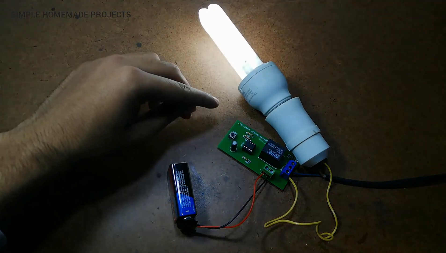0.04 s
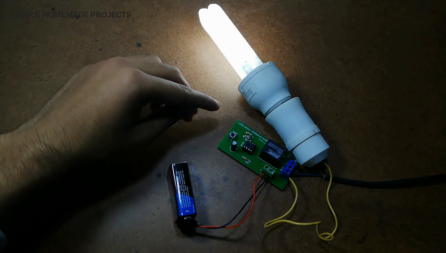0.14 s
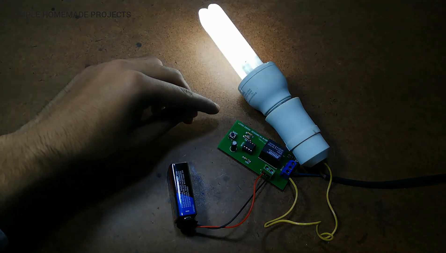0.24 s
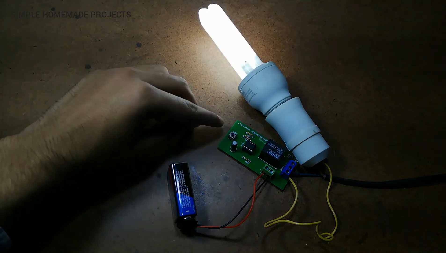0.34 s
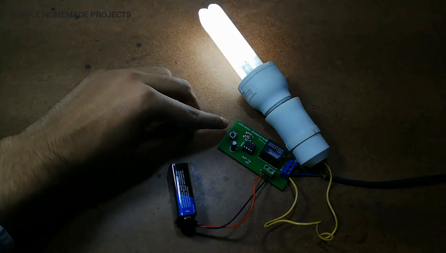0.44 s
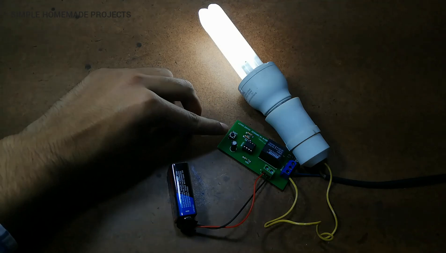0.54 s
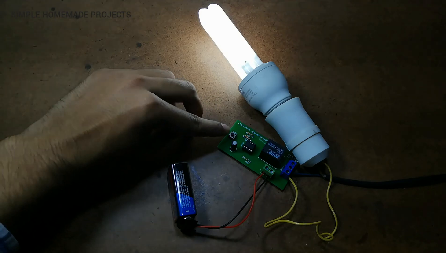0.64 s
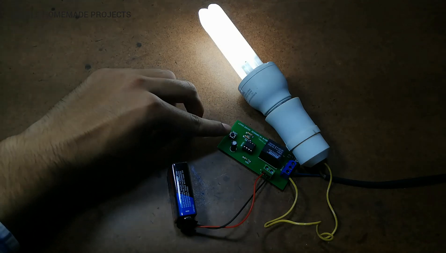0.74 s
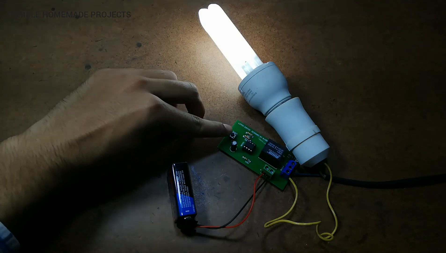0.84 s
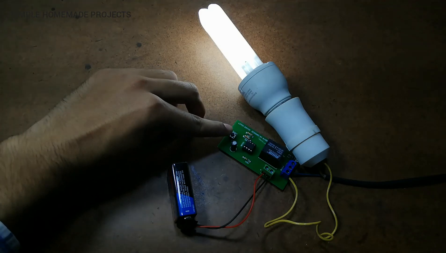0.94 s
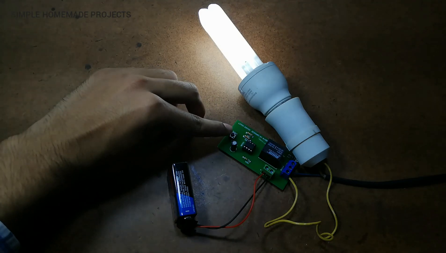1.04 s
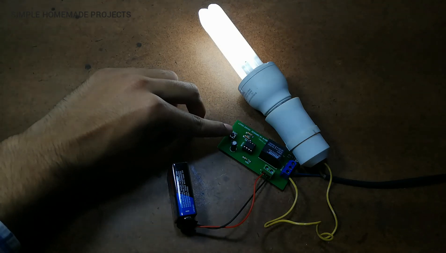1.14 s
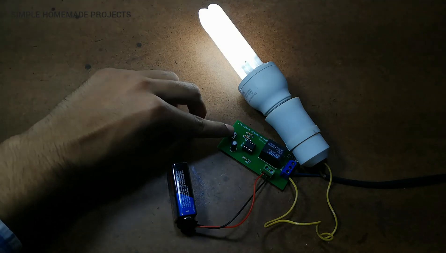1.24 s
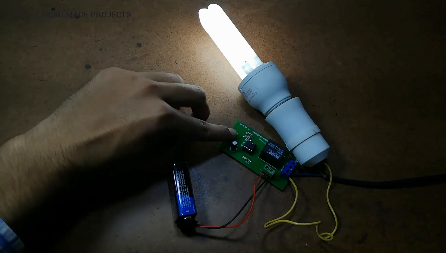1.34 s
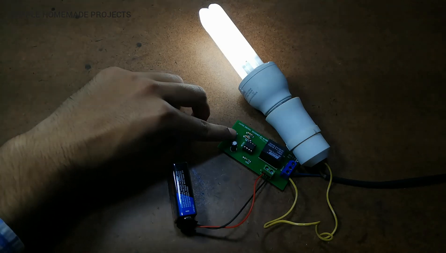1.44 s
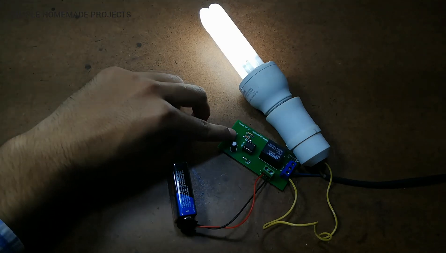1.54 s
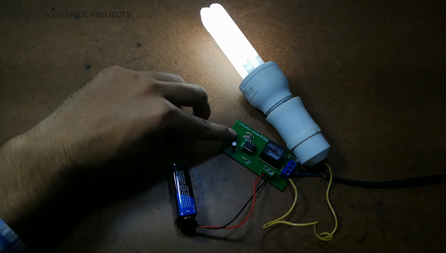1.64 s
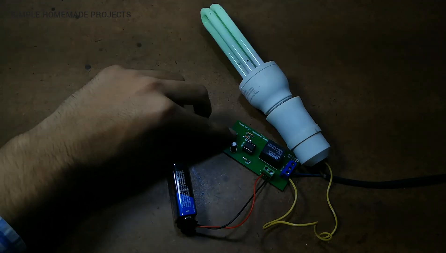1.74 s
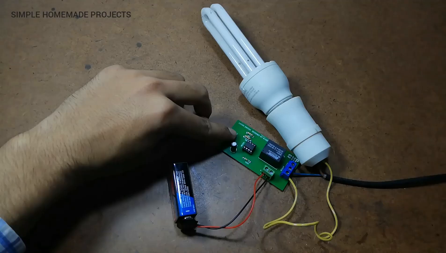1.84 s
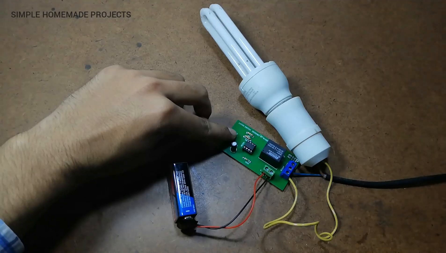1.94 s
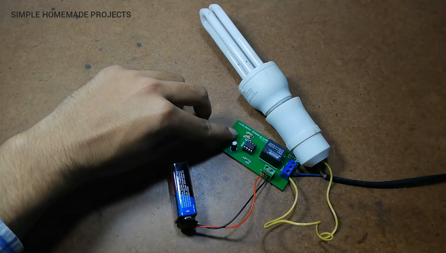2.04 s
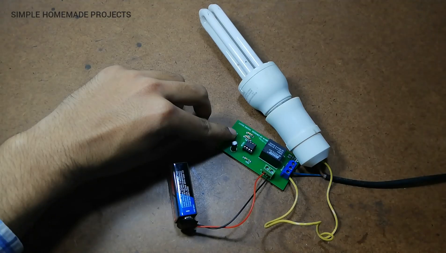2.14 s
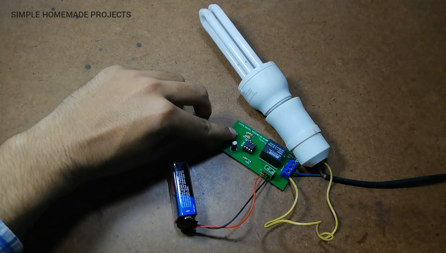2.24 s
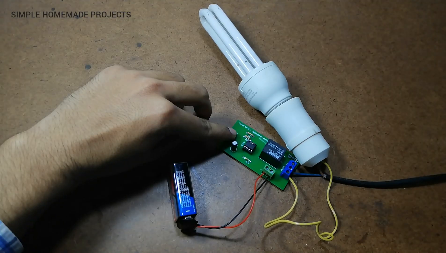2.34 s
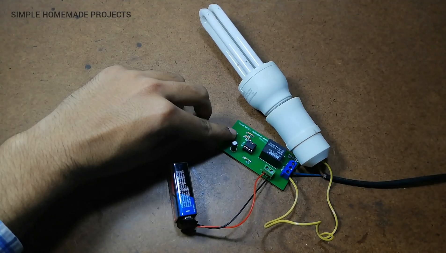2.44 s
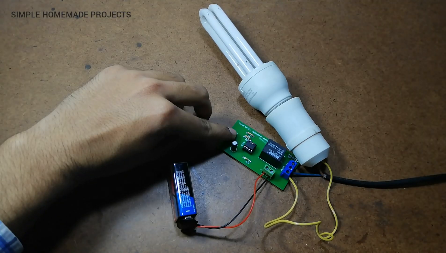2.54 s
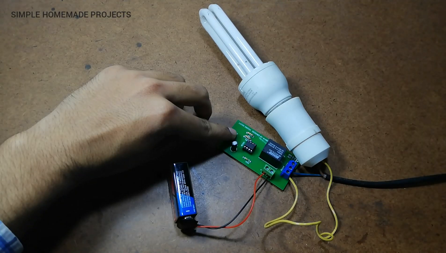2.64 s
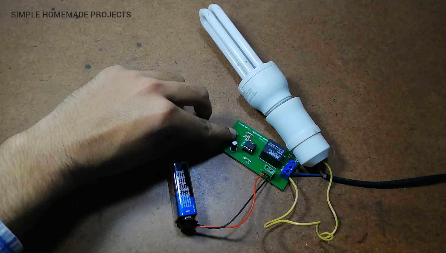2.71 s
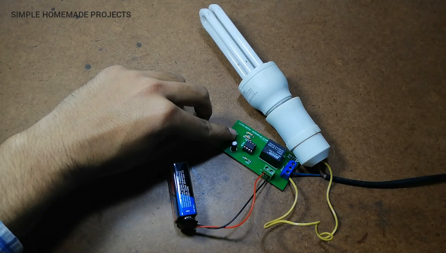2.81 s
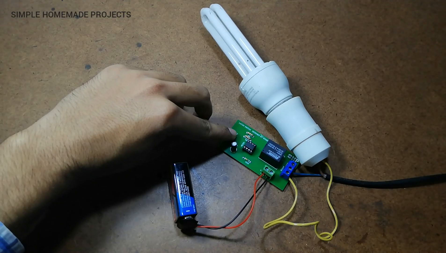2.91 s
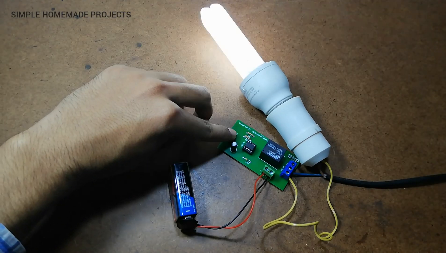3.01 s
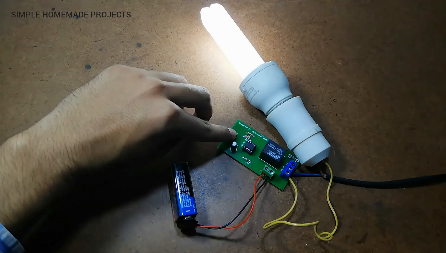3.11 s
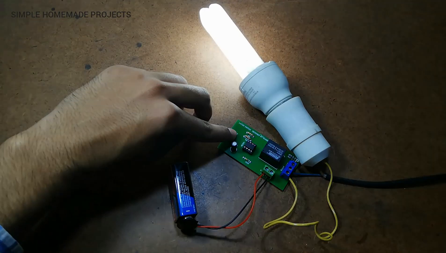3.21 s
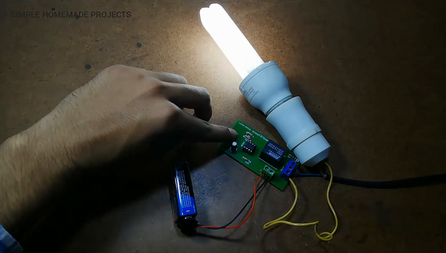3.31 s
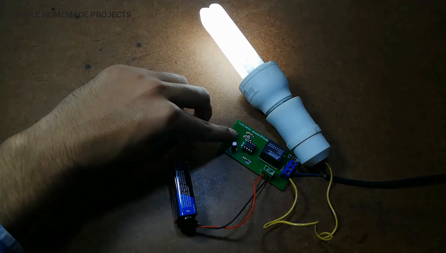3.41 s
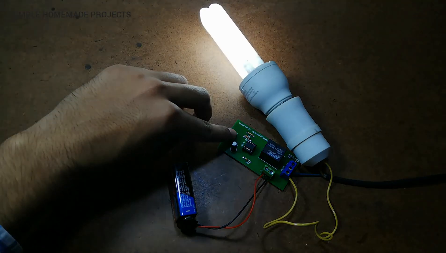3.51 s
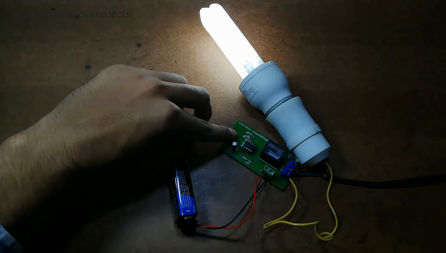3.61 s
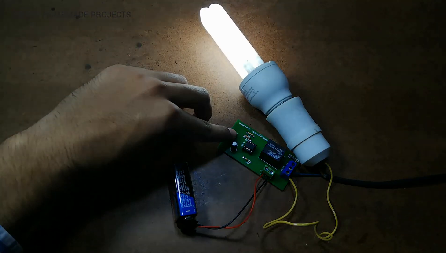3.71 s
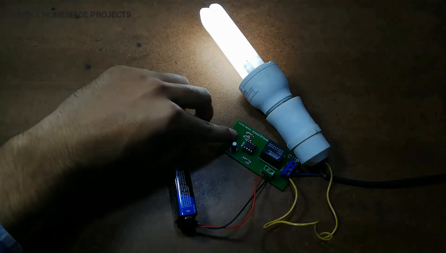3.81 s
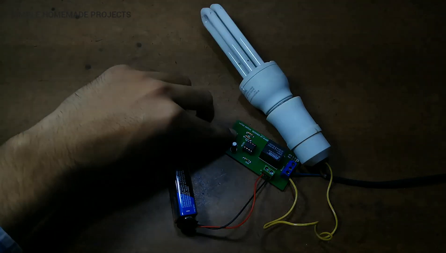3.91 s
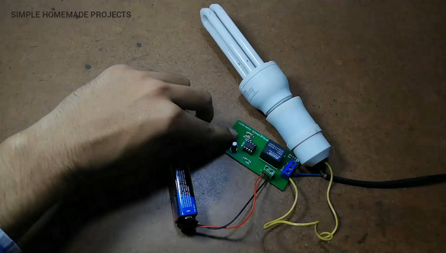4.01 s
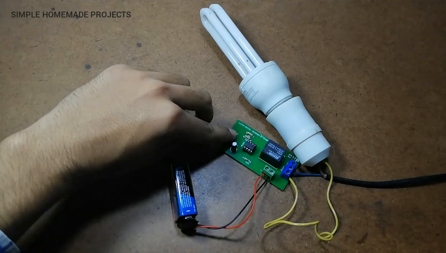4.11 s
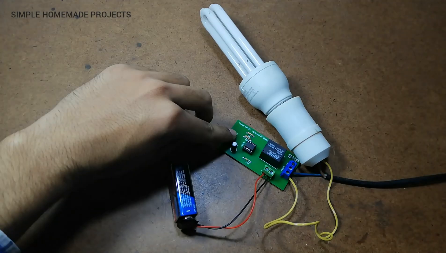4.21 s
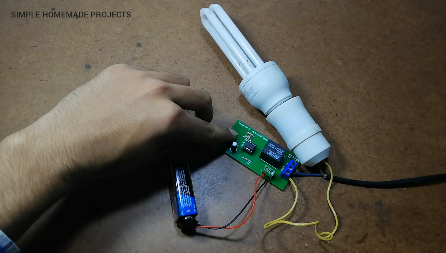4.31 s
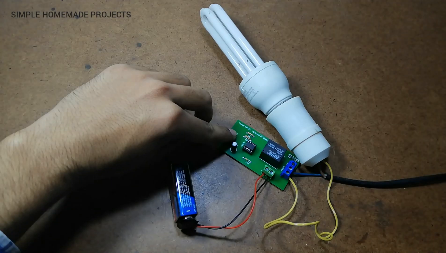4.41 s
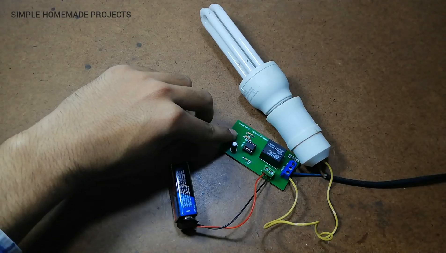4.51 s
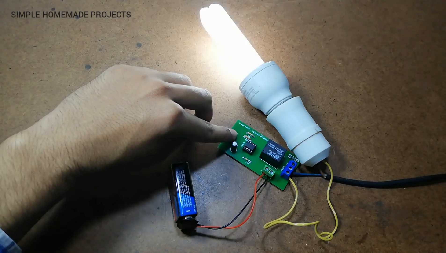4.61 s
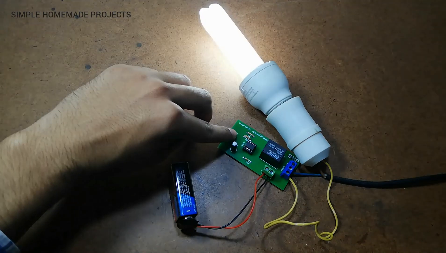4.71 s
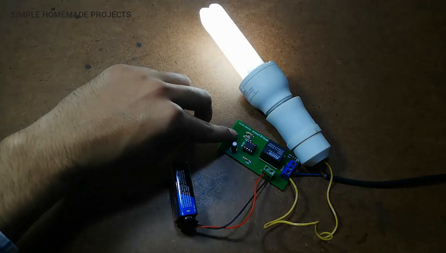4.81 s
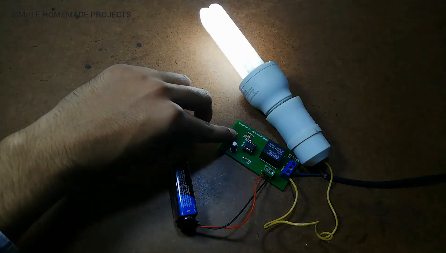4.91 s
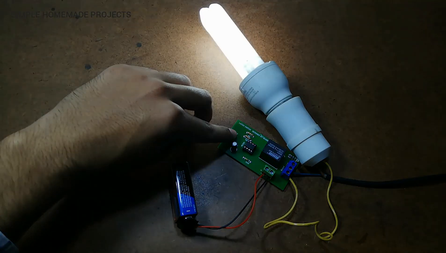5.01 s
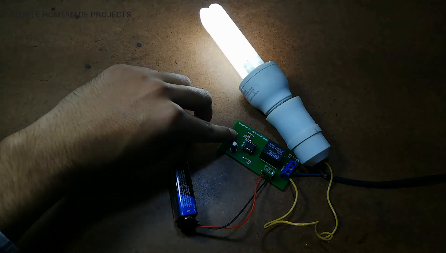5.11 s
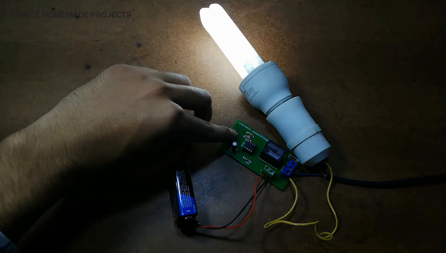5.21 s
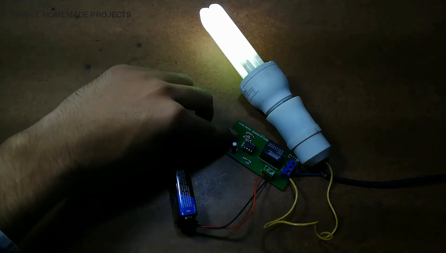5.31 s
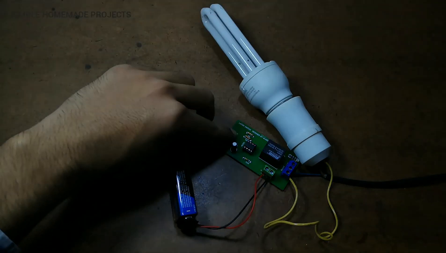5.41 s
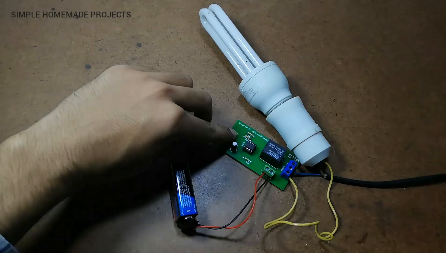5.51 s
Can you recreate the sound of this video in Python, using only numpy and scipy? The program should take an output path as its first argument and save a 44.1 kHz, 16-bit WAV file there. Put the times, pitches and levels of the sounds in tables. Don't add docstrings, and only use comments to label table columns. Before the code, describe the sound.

Close stereo microphone at a table in a small hard room. A finger presses a tiny button five times at irregular intervals; each press thuds softly and instantly trips a relay with a loud, bright clack. Releases give lighter dome snaps. Drop-outs sound doubled, pull-ins single. Faint hum, rumble, hiss and a distant regular tick lie underneath.

```python
import sys
import numpy as np
from scipy import signal
from scipy.fft import rfft, irfft
from scipy.io import wavfile
from scipy.ndimage import uniform_filter1d

SR = 44100
rng = np.random.default_rng(int(sys.argv[2]) if len(sys.argv) > 2 else 0)


def volts_from_decibels(level):
    exponent = np.asarray(level, float) / 20
    return 10 ** exponent


def unload_wav(signal):
    wavfile.write(
        sys.argv[1],
        SR,
        np.round(np.clip(np.atleast_2d(signal).T, -1, 1) * 32767).astype(np.int16),
    )


N = 244755

# start_s [s], peak_db [dB]
PULL_IN = [
    (2.9497, 2),
    (4.4832, 1.5),
]


def on_log(table, hz):
    table_hz, value = np.transpose(table)
    return np.interp(np.log(np.maximum(hz, 1)), np.log(table_hz), value)


def shaped(gain, channels):
    noise = rng.standard_normal((channels, N))
    x = irfft(rfft(noise) * gain, N)
    return x / np.sqrt(np.mean(x ** 2))


def wander(rate_hz):
    f = np.fft.rfftfreq(N, 1 / SR)
    return shaped(1 / (1 + (f / rate_hz) ** 2), channels=1)


def high(x, hz):
    return signal.sosfilt(signal.butter(4, hz, "high", fs=SR, output="sos"), x)


def add(track, start_s, sound):
    i = int(start_s * SR)
    track[:, i:i + sound.shape[1]] += sound[:, :N - i]


def ring(modes, contact_ms, scatter_db, cycles, flip=-1, lead=1):
    # pitch_hz [Hz], left_lead [radians]
    port_lead = [(0, 0), (5200, 1.1077), (5900, 5), (6500, 0.48), (7400, -0.15), (8400, 4), (10200, .2),
                 (12200, -1.5)]
    t = np.arange(int(.08 * SR)) / SR
    hz, db, t60_s, pan_db = (column[:, None] for column in np.transpose(modes))
    db = db + scatter_db * rng.standard_normal(db.shape)
    side = np.array([.5, -.5])[:, None, None]
    swell = (1 - np.exp(-t * hz / max(cycles, .01))) ** 3
    swell = swell * flip ** np.arange(len(modes))[:, None]
    level = volts_from_decibels(db + side * pan_db - 60 * t / np.maximum(t60_s, .001)) * swell
    phase = 2 * np.pi * hz * t + side * lead * on_log(port_lead, hz)
    x = (level * np.sin(phase)).sum(axis=1)
    contact = np.clip(np.arange(64) / SR / (contact_ms * 1e-3), 0, 1)
    push = np.sin(np.pi * contact)[None] + 1e-9
    x = signal.fftconvolve(x, push, axes=1)
    return x / np.abs(x).max()


def air():
    # pitch_hz [Hz], level_db [dB per Hz]
    rumble = [(15, -35), (40, 3), (63, -1.5), (202, -8.5), (252, -14.5), (389, -21.5), (687, -29.5),
              (2000, -48)]
    # pitch_hz [Hz], level_db [dB per Hz]
    hiss = [(500, -30.5), (1320, -23), (2270, -27.5), (7110, -31.5), (9580, -29), (15200, -41.5),
            (15900, -46.5), (16200, -86)]
    # pitch_hz [Hz], level_db [dB]
    side_level = [(60, -22.5), (110, -19), (380, 2.5), (700, 6.5), (1290, -4.5), (2380, 1), (8120, 0),
                  (15000, -2.5)]
    # pitch_hz [Hz], level_db [dB rms], pitch_wander [Hz], level_wander [dB]
    hum_tones = [(48.44, -68.5, 2.5, 3.5), (96.24, -70.5, 5.6, 1.5), (200.32, -67, 2.5, 0.08),
                 (302.7, -83, 5, 1.5)]
    f = np.fft.rfftfreq(N, 1 / SR)
    colour = np.hypot(volts_from_decibels(on_log(rumble, f)), volts_from_decibels(on_log(hiss, f)))
    colour = colour / (1 + (34 / (f + 1)) ** 8)
    mid, side = rfft(shaped(colour, channels=2))
    mid, side = irfft(mid, N), irfft(side * volts_from_decibels(on_log(side_level, f)), N)
    hum = 0
    for hz, db, drift_hz, wander_db in hum_tones:
        phase = 2 * np.pi * np.cumsum(hz + drift_hz * wander(8)) / SR
        hum = hum + np.sqrt(2) * volts_from_decibels(db + wander_db * wander(4.3)) * np.sin(phase)
    return volts_from_decibels(-62) * np.array([mid + side, mid - side]) + hum


def far_ticks():
    # pitch_hz [Hz], level_db [dB], t60_s [s to fall 60 dB], pan_db [dB]
    far_modes = [(1050, -9, 0.017, 0), (1290, -6, .05, 0), (1563, -9, 0.02, 0), (1995, -15, 0.009, 0),
                 (2819, -14, 0.012, 0), (4430, -15, 0.009, 0)]
    first_s, period_s = .011, .907
    out = np.zeros((2, N))
    for start_s in np.arange(first_s, N / SR, period_s):
        db = -43.8 + .8 * rng.standard_normal()
        add(out, start_s, volts_from_decibels(db) * ring(far_modes, contact_ms=0.27, scatter_db=4.0, cycles=0.34))
    return out


def button():
    # start_s [s], thud_db [dB], snap_db [dB], board_hz [Hz], contact_ms [ms]
    brush = [(.309, -57, -79.5, 899, 0.458), (.318, -49.5, -80, 866, 0.38), (.357, -57, -79.5, 876, 0.47),
             (.366, -56, -78.5, 862, 0.45), (.457, -57.5, -79.5, 1000, .2),
             (1.532, -54.5, -76.5, 1005, 0.28), (1.62, -52, -79, 945, 0.22)]
    presses = [
        (1.683, -33.5, -43, 943, 0.62),
        (1.8727, -39, -32.5, 1050, .2),
        (2.9447, -31, -43, 876, .3),
        (3.089, -28, -20, 916, .2),
        (3.7758, -31, -26, 937, 0.56),
        (3.9246, -24.5, -37.5, 849, .4),
        (4.478, -32, -39, 891, 0.35),
        (4.603, -21.5, -21, 915, 0.37),
        (5.2454, -30.5, -32, 900, 0.18),
        (5.4209, -23.5, -20.5, 910, 0.092),
    ]
    nail_taps = [
        (2.8385, -37.5, -68.5, 780, 0.15),
        (5.3916, -25.5, -74.5, 970, 0.08),
        (5.3946, -31, -52, 906, 0.12),
    ]
    # ratio [times board_hz], level_db [dB], t60_s [s], pan_db [left minus right dB]
    board_modes = [(.35, -8, .014, 2), (.65, -20, .01, 2), (.88, -1, 0.014, 4), (1.1, 2.5, .014, 1),
                   (1.4, -5.5, .01, 4.5), (1.7, -5, .009, -1), (2.1, -8, 0.008, -5)]
    # ratio [times board_hz], level_db [dB], t60_s [s], pan_db [dB]
    nail_modes = [(.2, -11, 0.027, 4.5), (.5, -12, .014, 2), (.95, 1, .017, 2.5), (1.2, -3, .012, 2),
                  (1.8, -1, .011, 0), (2.3, -3, .008, -5), (3.0, -8, .005, -4), (4.2, -11, .003, -1),
                  (5.3, -16, .003, -2.5)]
    # pitch_hz [Hz], level_db [dB], t60_s [s], pan_db [left minus right dB]
    dome_modes = [(4420, -6, 0.011, 2), (4850, -8.5, .008, -2.5), (5800, -17, 0.004, 2.5),
                  (7096, -2, 0.006, 0.5), (7800, -1, 0.0053, 4), (8400, -1, 0.0066, 8),
                  (9100, -1, .005, 2.5), (10000, -3.5, 0.0067, -3.5), (11500, -12.5, 0.0036, -5),
                  (13000, -14, .003, -6.5), (14600, -12, .003, -3.5)]
    rebound_s, rebound_db = .0032, -13
    thuds, taps, snaps = np.zeros((3, 2, N))
    kinds = ((presses + brush, board_modes, .2, thuds, .0005), (nail_taps, nail_modes, .08, taps, 0))
    for events, body, cycles, track, lead_s in kinds:
        for start_s, thud_db, snap_db, board_hz, contact_ms in events:
            board = [(ratio * board_hz, db, t60_s, pan_db) for ratio, db, t60_s, pan_db in body]
            thud = ring(board, contact_ms=max(contact_ms, .05), scatter_db=1.6, cycles=cycles, flip=0.914)
            add(track, start_s - lead_s, -volts_from_decibels(thud_db) * thud)
            for lag_s, lag_db in ((0, 0), (rebound_s, rebound_db)):
                snap = ring(dome_modes, contact_ms=0.051, scatter_db=2.52, cycles=.3, lead=.3)
                add(snaps, start_s + lag_s - .0003, volts_from_decibels(snap_db + lag_db) * snap)
    return taps + high(thuds, 660) + high(snaps, 4100)


def drop_blows():
    # start_s [s], first_db [dB], rebound_db [dB]
    drop_out = [
        (1.6878, -2.5, 1),
        (3.7807, -2, 1),
        (5.2503, -3, 2),
    ]
    rebound_s = .00245
    blows = []
    for start_s, first_db, again_db in drop_out:
        blows += [(start_s, first_db), (start_s + rebound_s, again_db)]
    return blows


def relay():
    # pitch_hz [Hz], level_db [dB], t60_s [s], pan_db [left minus right dB]
    pull_modes = [(1934, -37, 0.021, -5.5), (3420, -40, 0.0033, -1), (4560, -16, 0.0083, 1.5),
                  (5300, -17, .006, -2), (6096, -10, .005, -3), (6997, -12.5, 0.011, 9),
                  (7660, -19, 0.0079, 16), (8600, -16.5, .006, 10.5), (9675, 4.5, 0.0083, 0),
                  (10300, -9.5, 0.0054, 1), (11450, -6, 0.0084, -7), (13388, -26, 0.003564, -7),
                  (14700, -34, .008, 9.5), (17200, -38, .006, 9)]
    # pitch_hz [Hz], level_db [dB],
    # t60_s [s], pan_db [left minus right dB]
    drop_out_modes = [(454.2, -22.5, 0.018, 0.5), (780, -36, 0.029, 5.5), (899.6, -25.5, 0.0371, 4),
                      (1010, -30, 0.11, 6.5), (1504, -44, 0.022, -4.5), (4408, -26, 0.0081, 5),
                      (5282, -16, 0.0099, 4),
                      (6513, -11.5, .007, 6.5), (6746, -3.5, 0.0044, 0.5), (7292, -5.5, 0.0059, -3),
                  (8103, -9.5, .008, 1.5), (8080, -8, 0.013, 1.5), (8865, -9, 0.012, 8.5),
                  (9426, -6.5, 0.0097, 3.5), (9984, -1.5, 0.0046, 5.5), (10636, -3.5, 0.0087, 2.5),
                  (11144, -9.5, .007, -5.5), (12130, -11.5, 0.0034, -10.5), (13620, -24.5, .008, 3),
                  (14444, -20.5, .006, -0.5), (16300, -23, .006, 6)]
    # delay_s [s], level_db [dB]
    pull_chatter = [(-.0005, -20.5), (.0009, -14.5), (.0021, -12), (.0033, -18), (.005, -21.5)]
    # delay_s [s], level_db [dB]
    drop_chatter = [(.0008, -4.5), (.0017, -6.5), (.0036, -12.5), (.005, -15), (.0066, -19.5)]
    out = np.zeros((2, N))
    kinds = ((PULL_IN, pull_modes, pull_chatter, .4),
             (drop_blows(), drop_out_modes, drop_chatter, .8))
    for blows, modes, chatter, cycles in kinds:
        for start_s, db in blows:
            for lag_s, lag_db in [(0, 0)] + chatter:
                clack = ring(modes, contact_ms=0.06, scatter_db=1.08, cycles=cycles)
                add(out, start_s + lag_s, volts_from_decibels(db + lag_db) * clack)
    return out


def relay_spread():
    # pitch_hz [Hz], width_hz [Hz], level_db [dB]
    pull_peaks = [(830, 280, -19), (2100, 900, -27), (4650, 900, -12), (5730, 1400, -16), (7190, 500, -6),
                  (9493, 600, 4), (11600, 900, -5), (14100, 1200, -24.5)]
    # pitch_hz [Hz], width_hz [Hz], level_db [dB]
    drop_peaks = [(773.5, 290, -18), (1000, 68, -7), (4500, 320, -23.5), (5195, 670, -15.5),
                  (6338, 300, -11.5), (6976, 280, -7), (7638, 150, -1.5), (8048, 120, -1), (8737, 210, -2),
                  (9510, 150, -4), (10213, 352.2, -4), (10710, 730, -4), (12156, 1200, -19),
                  (14300, 1500, -28.5)]
    out, f = 0, np.fft.rfftfreq(N, 1 / SR) + 1e-3
    for blows, peaks, spread_db in ((PULL_IN, pull_peaks, 18), (drop_blows(), drop_peaks, 22.5)):
        power = 0
        for hz, width_hz, db in peaks:
            off_pitch = hz / width_hz * (f / hz - hz / f)
            power = power + volts_from_decibels(2 * db) / (1 + 0.47 * off_pitch ** 2) ** 2
        colour = np.sqrt(power)
        for start_s, db in blows:
            out = out + volts_from_decibels(db + spread_db) * colour * np.exp(-2j * np.pi * f * start_s)
    return irfft(out, N)


def room(x):
    # pitch_hz [Hz], level_db [dB]
    bands = [(650, -21), (1200, -16), (2400, -12.5), (4800, -21), (7000, -17), (10000, -16), (15300, -18.5),
             (15900, -50.5)]
    band_t60_s = [.5, .5, .45, .45, .4, .4, .33, .3]
    gap_s, rise_s, bend_s = 0.0045, 0.0066, .4
    t = np.arange(int(.6 * SR)) / SR
    rise = np.clip((t - gap_s) / rise_s, 0, 1)
    fade = 60 * t * (.8 + t / bend_s)
    octave = np.log2(np.maximum(np.fft.rfftfreq(len(t), 1 / SR), 1))
    centres = np.log2([hz for hz, _ in bands])
    noise, tail = rfft(rng.standard_normal((2, len(t)))), 0
    for k, ((_, db), t60_s) in enumerate(zip(bands, band_t60_s)):
        share = np.interp(octave, centres, np.arange(len(bands)) == k)
        tail = tail + volts_from_decibels(db - 20 - fade / t60_s) * irfft(noise * share, len(t))
    return signal.fftconvolve(x[:1], tail * rise, axes=1)[:, :N]


def scene():
    background, ticks = air(), far_ticks()
    finger, clacks = button(), relay()
    sent = volts_from_decibels(-15) * clacks + volts_from_decibels(-3.5) * finger
    return clacks + finger + room(sent + relay_spread() + ticks) + background


def low_pass(x):
    return signal.sosfilt(signal.butter(12, 16810, fs=SR, output="sos"), x)


def record(dry):
    duck_db, duck_depth, duck_s, lag_s = -52, .2, .03, .004
    keep = np.exp(-1 / (duck_s * SR))
    loud = signal.lfilter([1 - keep], [1, -keep], np.mean(dry ** 2, axis=0))
    over_db = np.maximum(10 * np.log10(loud + 1e-12) - duck_db, 0)
    lag = int(lag_s * SR)
    over_db = uniform_filter1d(over_db, lag, origin=int(lag_s * SR / 2) - 1)
    x = dry * volts_from_decibels(-duck_depth * over_db)
    x = x / (1 + x ** 4) ** .25
    x = signal.sosfilt(signal.ellip(10, .2, 80, 16000, fs=SR, output="sos"), x)
    return low_pass(x)


dry = scene()
out = record(dry)
unload_wav(out)
```